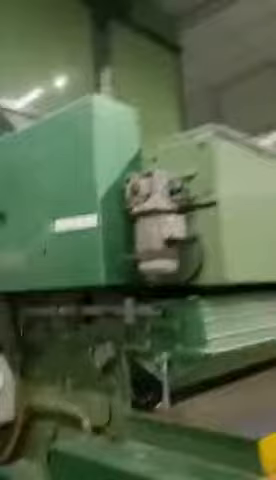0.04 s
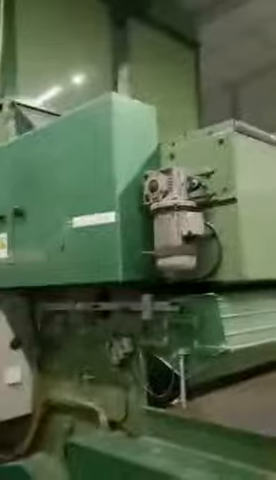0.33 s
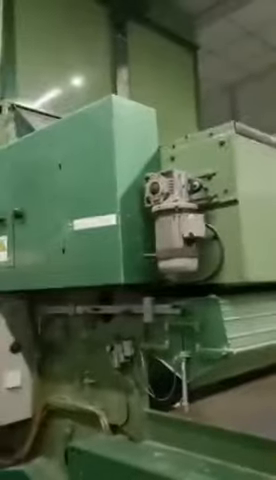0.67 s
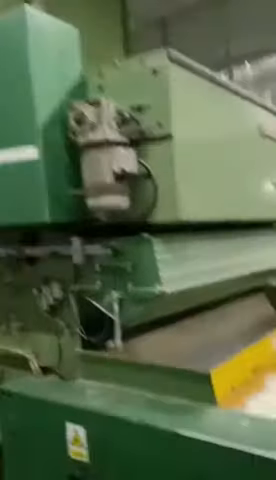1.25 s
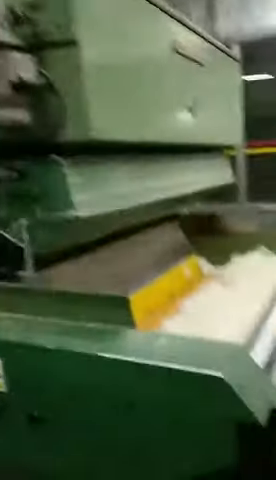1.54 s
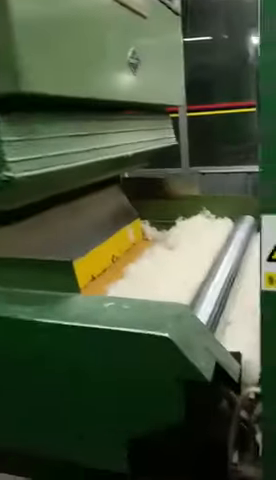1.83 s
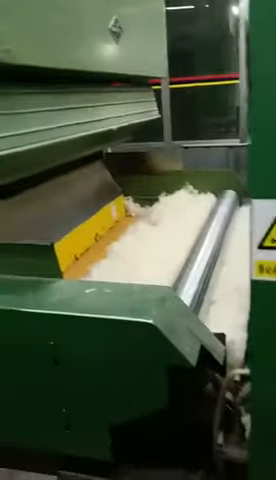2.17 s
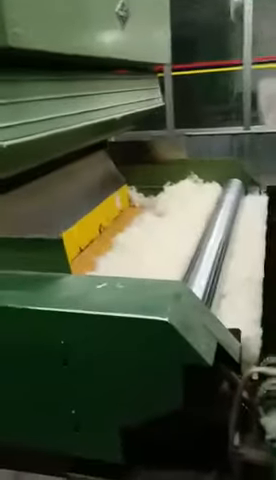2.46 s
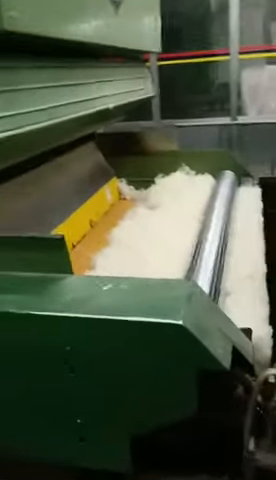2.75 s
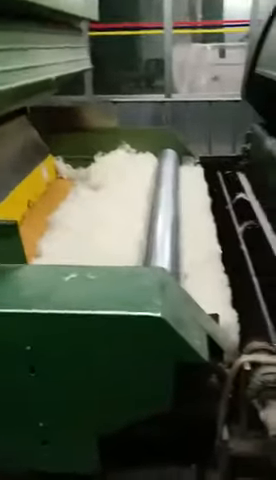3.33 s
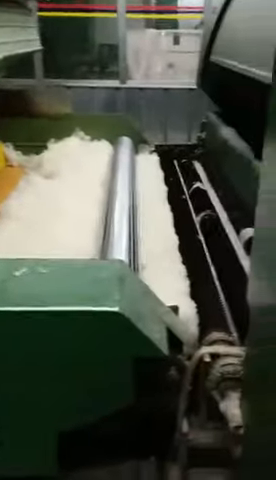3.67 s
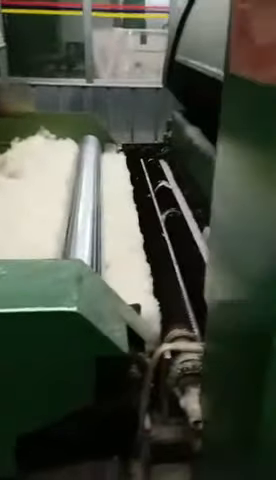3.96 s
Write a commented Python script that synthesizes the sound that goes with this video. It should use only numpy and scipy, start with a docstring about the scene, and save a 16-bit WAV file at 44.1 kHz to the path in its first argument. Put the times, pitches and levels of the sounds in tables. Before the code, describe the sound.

Steady roar and hum of a carding machine, its whining rollers briefly scraping and squeaking.

```python
"""A carding machine runs in a factory hall, heard from beside its feed rollers.
The sound fades in over the first 0.4 s. From then on cylinders and fans roar with a faint ringing grain,
motors and gears hum, and the wire-clad rollers sing near 3 kHz. Two faint rubs pass. At about 2.4 s
a roller scrapes: the rubbing swells and a few short squeals break out. From 3 s the machine just runs on."""
import sys
import numpy as np
from scipy import signal
from scipy.fft import rfft, irfft
from scipy.io import wavfile
from scipy.ndimage import uniform_filter1d

SR = 44100
rng = np.random.default_rng(int(sys.argv[2]) if len(sys.argv) > 2 else 0)


def bounce(signal):
    """Save signal as a 16-bit WAV file at the path given by the first command-line argument."""
    frames = np.transpose(np.atleast_2d(signal))
    limited = np.clip(frames, -1, 1)
    pcm = np.round(limited * 32767).astype(np.int16)
    wavfile.write(sys.argv[1], SR, pcm)


N = 176400
TIME = np.arange(N) / SR
FREQS = np.maximum(np.arange(N // 2 + 1) * SR / N, 1)
STEP = 40  # samples between the values of a slow random curve

# Levels in the tables are relative. "Lean" is how much louder the left is than the right.
# Stereo width of the hall. Each row: frequency in Hz, side signal over middle signal in dB.
HALL_WIDTH = [(30, -15.5), (70, -29), (125, -39.5), (190, -29.5), (260, -26), (350, -9.5), (430, -6.5),
              (580, -3), (650, -7.5), (820, -4), (1000, 0.8), (1500, 2.5), (2100, 1.5), (3000, -0.8),
              (4000, 1), (7000, 0.3)]
# Tone colour of the cylinders and fans. Each row: frequency in Hz, level in dB.
ROAR_COLOUR = [(25, -33), (45, -18.5), (68, -14.5), (90, -4.5), (150, -1), (270, 2), (420, -1.5), (600, -4),
               (850, -8.5), (1200, -13), (1800, -16), (2500, -15), (3100, -10), (3500, -24.5), (4500, -28),
               (5500, -30.5), (6600, -29.5), (7500, -31.5)]
# Where the roar sits. Each row: frequency in Hz, lean in dB (reduced later in the bass).
ROAR_LEAN = [(250, 1.5), (420, 1), (650, -2), (1000, -0.5), (1450, 1.2), (1800, 0), (2700, 3), (3500, -1.5),
             (5300, -1.5), (7000, 0.3)]
# The roar's upper middle as the listener moves along. Each row: time in seconds, level in dB.
UPPER_MID_LEVEL = [(.3, 0), (.9, 0.2), (1.42, 0), (1.6, 0), (2.25, -0.2), (2.45, -0.4), (2.8, 1.3),
                   (3.2, -0.7), (4, -0.9)]
# The part of the roar that follows that change. Each row: frequency in Hz, share from 0 to 1.
UPPER_MID_SHARE = [(600, 0), (1100, 1), (2200, 1), (3500, 0)]
# Faint pings in the roar. Each row: frequency in Hz, level of the pings at one pitch in dB.
PING_COLOUR = [(900, -49), (1400, -53.5), (2500, -54.5), (3600, -61.5), (7000, -64.5)]
# Motor and gear tones. Each row: pitch in Hz, level in dB, lean in dB (reduced later in the bass).
DRIVE_TONES = [(98.5, -45, 0), (133.2, -44.5, 0), (153.4, -38, 0), (177.6, -41.5, 0), (209.9, -42.5, 0),
               (323, -44, 1), (356.6, -37.3, 0), (398.4, -39.5, 1), (429.3, -42.3, -1), (489.9, -39.7, 2),
               (530, -42.5, 0), (796.7, -49, 2), (889.6, -43.3, -3), (1290, -54, 0), (1351.2, -52, 3),
               (1513, -56, 0), (1884.2, -56, 5), (2262, -56.5, 2)]
# The nearest motor as the listener passes it. Each row: time in seconds, level in dB.
MOTOR_PASS = [(.3, -39.5), (1, -37.5), (2.2, -39), (2.5, -42), (3.1, -45), (3.5, -38), (4, -35)]
# Tones of the rollers' whine. Each row: pitch in Hz, level in dB, lean in dB.
ROLLER_TONES = [(2638, -50, 8), (2749.5, -46, 6), (2810, -46, 3), (2862.6, -38.7, 6), (2880, -46, 3),
                (2908, -44.5, 3), (2923, -37, 0), (2952.7, -36, 4), (2973, -37.3, 3), (2984, -36.8, 3),
                (3035, -44, 1), (3096.7, -43, 6), (3143, -50, 3), (3210, -50, 3), (3968.8, -62, 8),
                (5970, -57, -4)]
# Ringing of the rubbed wire. Each row: centre in Hz, width in Hz, level in dB, lean in dB.
WIRE_RINGS = [(2941, 210, -35, 2), (2655, 110, -44, 13.5), (5916, 550, -47.5, 0.5)]
# Rise and fall of the whine. Each row: time in seconds, level in dB.
ROLLER_LEVEL = [(.28, -1.5), (.37, 2.3), (.5, -0.4), (.63, 1), (.69, -6.5), (.72, 2), (.84, 2), (.9, 0.3),
                (1.12, -0.3), (1.21, 2), (1.3, -3.7), (1.37, 1), (1.47, -2), (1.65, -0.4), (2.05, -1.5),
                (2.6, 0.4), (2.78, -2), (2.92, .7), (3.42, .3), (3.55, -0.7), (4, 0)]
# Swells of rubbing. Each row: start and length in seconds, centre and width in Hz, level and lean in dB.
RUBS = [(2.368, 0.037, 1950, 1600, -32, -4), (2.4, 0.13, 2080, 890, -44, -1),
        (2.38, 0.53, 5500, 5100, -45.5, 1), (1.4, 0.32, 4800, 450, -53.5, 2),
        (2.13, 0.07, 5300, 520, -47.5, 2)]
# Squeals of slipping metal. Each row: start and length in seconds, pitch in Hz,
# glide in Hz per second, level and lean in dB.
METAL_SQUEALS = [(2.47, .075, 4805, -300, -45, -3), (2.585, .075, 4795, -500, -45, -2),
                 (2.725, .05, 3985, 0, -42.5, 4), (2.79, .05, 3945, 1200, -42.5, 4),
                 (2.715, .1, 5945, 500, -39, 2), (2.83, .1, 5985, -200, -39.5, 2),
                 (2.765, .04, 5670, 0, -43, -5), (2.955, .04, 5730, 0, -45.5, 0),
                 (2.955, .075, 5900, 800, -45.5, 0)]
# The opening fade. Each row: time in seconds, level in dB.
FADE_IN = [(0, -84), (.103, -73), (.128, -13.5), (.17, -12), (.19, -7.5), (.26, -2), (.33, 1.5), (.4, 2.5)]


def from_db(db):
    """Turn decibels into a number to multiply by."""
    return 10 ** (np.asarray(db) / 20)


def rms_one(x):
    """Scale a signal so that its average power is 1."""
    return x / np.sqrt(np.mean(np.abs(x) ** 2) + 1e-20)


def at_hz(points, hz):
    """Read a table at a frequency, with octaves evenly spaced."""
    freqs, values = np.transpose(points)
    return np.interp(np.log(hz), np.log(freqs), values)


def over_time(points):
    """Join a table's points into one value per sample."""
    return np.interp(TIME, *np.transpose(points))


def pan(lean_db):
    """Left and right gains that keep the total power the same."""
    gains = from_db(np.array([[.5], [-.5]]) * lean_db)
    return gains / np.sqrt(np.mean(gains ** 2, axis=0))


def shadow(hz):
    """How much of a lean survives: long waves, below about 300 Hz, reach both sides equally."""
    return 1 / (1 + (300 / hz) ** 6)


def slow(rate):
    """A smooth random curve of typical size 1; a higher rate (Hz) makes it move faster."""
    memory = np.exp(-2 * np.pi * rate * STEP / SR)
    noise = rng.standard_normal(N // STEP + 2001)
    return rms_one(signal.lfilter([1], [1, -2 * memory, memory ** 2], noise)[2000:])


def drift(rate):
    """A slow random curve filled in at every sample."""
    points = slow(rate)
    return np.interp(TIME, np.arange(len(points)) * STEP / SR, points)


def burst(start, length, edge_s=.018):
    """The loudness of a passing rub: rise, hold, fall."""
    return np.clip(np.minimum(TIME - start, start + length - TIME) / edge_s + .5, 0, 1)


def in_hall(mid, side, hz):
    """Make left and right from two signals: alike in the bass, spread out in the treble."""
    width = from_db(at_hz(HALL_WIDTH, hz))
    return (mid + width * side * np.array([[1], [-1]])) / np.sqrt(1 + width ** 2)


def hall_noise():
    """The spectrum of white noise as the hall spreads it."""
    return in_hall(*rfft(rng.standard_normal((2, N))), FREQS)


def resonance(hz, width_hz):
    """Friction noise goes twice through one resonance, leaving a pitched hiss."""
    detune = (FREQS ** 2 - hz ** 2) / (FREQS * width_hz)
    return rms_one(irfft(hall_noise() / (1 + 1j * detune) ** 2, N))


def tone(hz, wander_hz, echo_share, rate, glide=0, start=0):
    """A slightly wandering tone arrives directly and as hall echoes that swell and fade."""
    wander = np.cumsum(wander_hz * slow(rate)) * STEP / SR + rng.random()
    t = np.arange(len(wander)) * STEP / SR
    cycles = wander + hz * t + glide * (t - start) ** 2 / 2
    mid, side = [rms_one(slow(rate) + 1j * slow(rate)) for _ in range(2)]
    direct = np.sqrt(1 - echo_share) * in_hall(0.75, 1j, hz)
    echoes = np.sqrt(echo_share) * in_hall(mid, side, hz)
    coarse = np.sqrt(2) * rms_one(direct + echoes) * np.exp(2j * np.pi * cycles)
    fine = np.exp(2j * np.pi * hz * TIME[:STEP])  # fills in the wave between steps
    return np.real(coarse[:, :, None] * fine).reshape(2, -1)[:, :N]


def roar(treble_hz=1000):
    """Air swirls around the cylinders. Each band flickers on its own, most in the treble."""
    lean_db = at_hz(ROAR_LEAN, FREQS) * shadow(FREQS)
    spectrum = hall_noise() * from_db(at_hz(ROAR_COLOUR, FREQS)) * pan(lean_db)
    edges = np.r_[1, np.geomspace(45, treble_hz, 9)[:-1], np.geomspace(treble_hz, 8000, 21)]
    upper_mid_db = over_time(UPPER_MID_LEVEL)
    air = 0
    for low, high in zip(edges, edges[1:]):
        flicker_db = drift(rate=21) if low < treble_hz else np.minimum(4 * drift(rate=18.8), 4)
        band = irfft(spectrum * ((FREQS >= low) & (FREQS < high)), N)
        air += band * from_db(flicker_db + upper_mid_db * at_hz(UPPER_MID_SHARE, high))
    surge = from_db(0.06 * drift(rate=5.3))
    return from_db(-25) * rms_one(air * surge)


def pings(pitches=30, pings_per_s=16, ring_s=0.15):
    """Faint, short random pings from 900 to 7000 Hz give the roar a ringing grain."""
    grain = np.zeros((2, N))
    decay = from_db(-60 / (ring_s * SR))
    for hz in np.geomspace(900, 7000, pitches) * rng.uniform(.97, 1.03, pitches):
        at = (np.cumsum(rng.exponential(1, 400)) / pings_per_s * SR).astype(int)
        strengths = from_db(2.5 * rng.standard_normal(400))
        pulses = np.bincount(at[at < N], strengths[at < N], N) + 1e-18
        angle = 2 * np.pi * hz / SR
        feedback = [1, -2 * decay * np.cos(angle), decay ** 2]
        for channel, phase in zip(grain, 2 * np.pi * rng.random(2)):
            ringing = signal.lfilter([np.cos(phase), -decay * np.cos(phase - angle)], feedback, pulses)
            channel += from_db(at_hz(PING_COLOUR, hz)) * rms_one(ringing)
    return grain


def drives():
    """Motors, belts and gears turn steadily, so they hum at steady pitches."""
    hum = 0
    for hz, db, lean in DRIVE_TONES:
        hum += from_db(db) * pan(lean * shadow(hz)) * tone(hz, wander_hz=.3, echo_share=.18, rate=2)
    return from_db(-1.27) * hum


def nearest_motor():
    """One motor's tone, partly blocked for a while as the listener moves on."""
    hum = tone(hz=644.7, wander_hz=.3, echo_share=.06, rate=2)
    return from_db(over_time(MOTOR_PASS)) * pan(lean_db=-3) * hum


def steadied(x, span_s):
    """Even out swells slower than the span; quick flutter stays."""
    power = uniform_filter1d(np.mean(x ** 2, axis=0), int(span_s * SR))
    return x * np.sqrt(power.mean() / (power + 1e-20))


def rollers():
    """Tones close in pitch throb against each other over the fluttering ring of rubbed wire."""
    tones = sum(from_db(db) * pan(lean) * tone(hz, wander_hz=2.5, echo_share=.6, rate=5)
                for hz, db, lean in ROLLER_TONES)
    ring = sum(from_db(db) * pan(lean) * resonance(hz, width) for hz, width, db, lean in WIRE_RINGS)
    flutter = rms_one(from_db(2.5 * drift(rate=27)))
    whine = steadied(from_db(-1.2) * tones + ring * flutter, span_s=.09)
    return from_db(over_time(ROLLER_LEVEL)) * whine


def rubbing():
    """A roller scrapes and rubs harder for a moment, so a hiss swells."""
    return sum(from_db(db) * pan(lean) * burst(start, length) * resonance(hz, width)
               for start, length, hz, width, db, lean in RUBS)


def squeals():
    """Metal sticks and slips: short, fluttering squeals that bend in pitch."""
    flutter = rms_one(from_db(2.4 * drift(rate=70)))
    slips = 0
    for start, length, hz, glide, db, lean in METAL_SQUEALS:
        squeal = tone(hz, wander_hz=12, echo_share=.14, rate=55, glide=glide, start=start)
        slips += from_db(db) * pan(lean) * burst(start, length) * squeal
    return flutter * slips


def scene():
    """The whole machine in its hall."""
    whine = rollers()
    background = roar() + drives() + nearest_motor()
    return background + whine + rubbing() + squeals() + pings()


def record(dry, notch_hz=3323, notch_width_hz=200, cutoff_hz=7520):
    """The microphone misses one narrow band; the sound fades in and the highest treble is cut."""
    notched = signal.lfilter(*signal.iirnotch(notch_hz, notch_hz / notch_width_hz, fs=SR), dry)
    faded = notched * from_db(over_time(FADE_IN))
    treble_cut = signal.ellip(14, .1, 90, cutoff_hz, fs=SR, output="sos")
    return signal.sosfilt(treble_cut, faded)


dry = scene()
out = record(dry)
bounce(out)
```